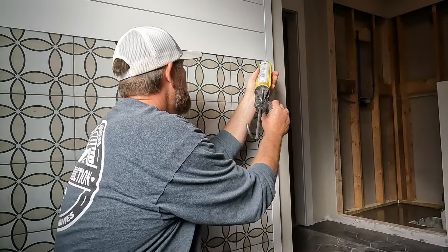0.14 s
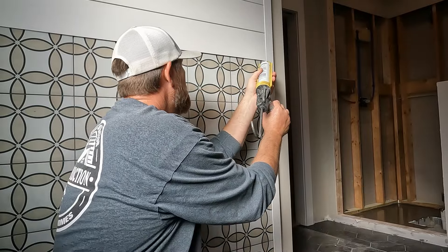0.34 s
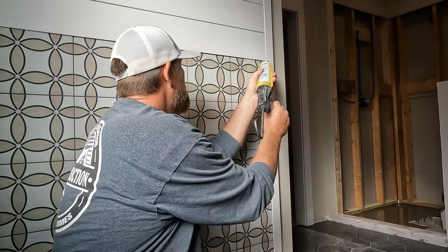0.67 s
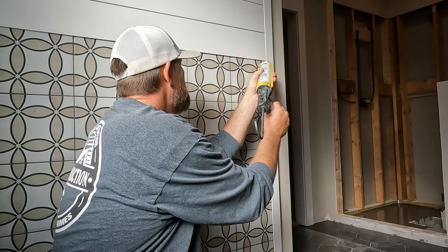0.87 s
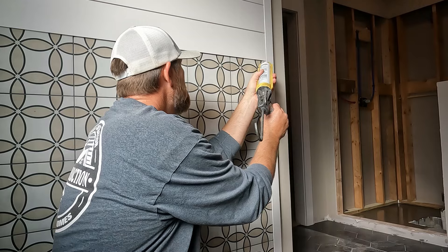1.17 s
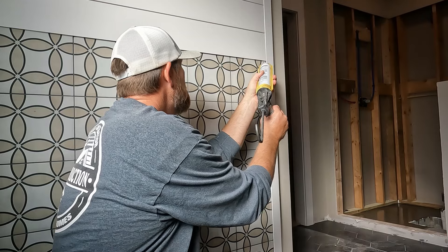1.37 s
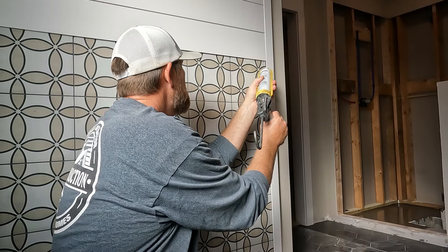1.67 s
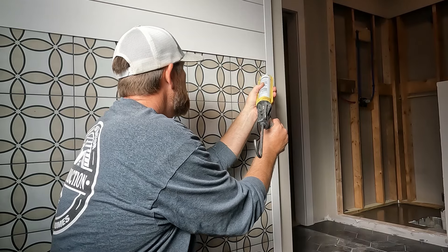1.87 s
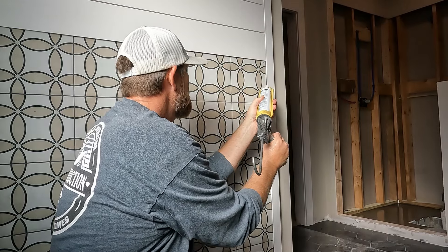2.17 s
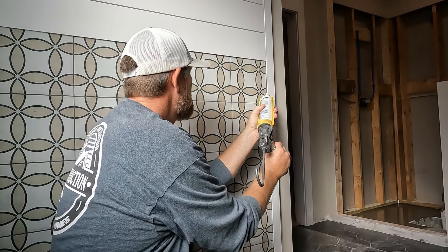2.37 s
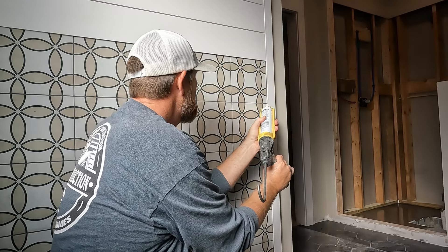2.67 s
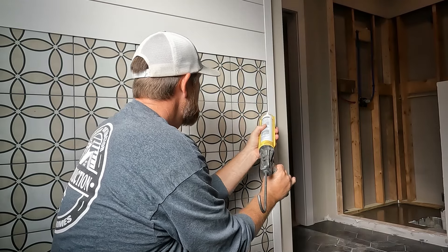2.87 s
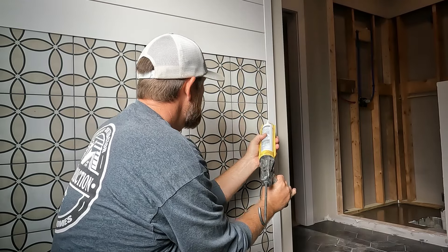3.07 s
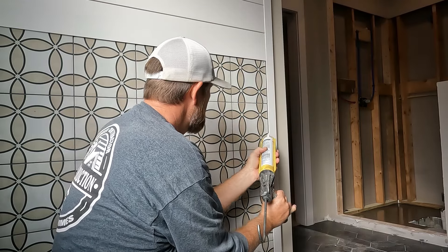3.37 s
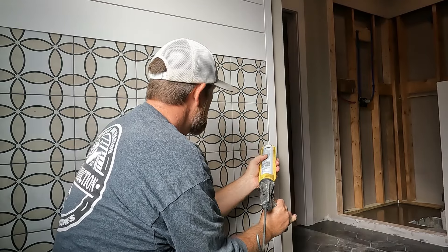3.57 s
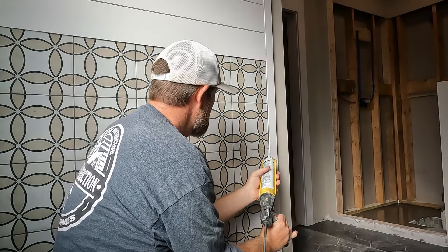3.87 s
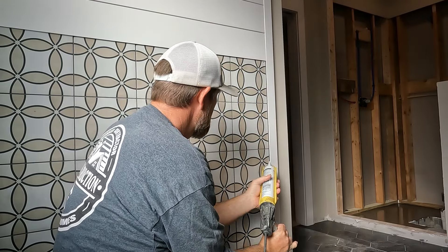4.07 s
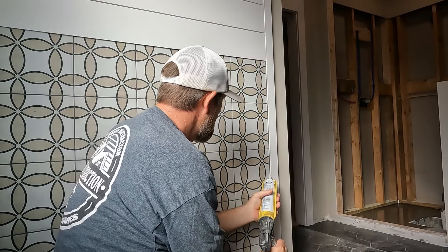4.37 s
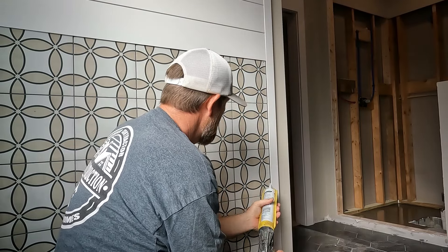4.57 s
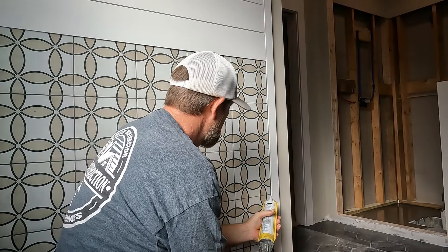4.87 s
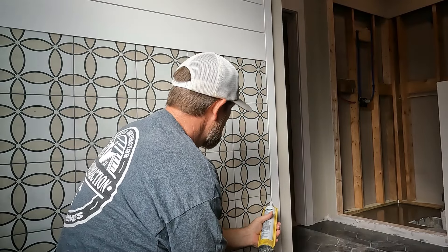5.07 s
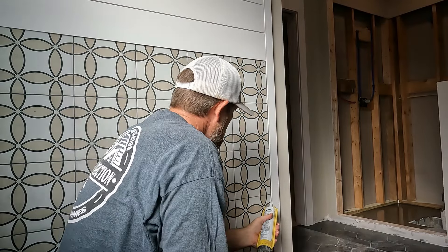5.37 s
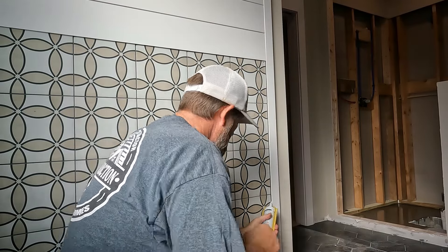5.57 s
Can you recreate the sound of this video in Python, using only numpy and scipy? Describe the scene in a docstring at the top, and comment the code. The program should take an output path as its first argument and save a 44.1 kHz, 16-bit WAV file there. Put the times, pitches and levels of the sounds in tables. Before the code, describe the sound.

Sparse, crisp clicks of a squeezed caulking gun over faint room hum, with soft knocks and thumps, ending in a loud ringing steel clack.

```python
"""A hand-held caulking gun is squeezed in a bare, tiled room under construction, a couple of metres away.
A trigger tick is dying away over air hiss, mains hum and a thin whistle; a soft knock, a floor thump and a low
dragging rub follow. Ticks go on, faint whine sets in, the rod snaps twice amid more knocks and thumps, then is
released with one loud clack. Blows are filtered pulses, knocks and thumps resonances struck once; rub, air and
whine are filtered noise, mains a sine, the whistle wavering sines. Blows and knocks ring in the room."""
import sys
import numpy as np
from scipy import signal
from scipy.fft import rfft, irfft, next_fast_len
from scipy.io import wavfile

SR = 44100
rng = np.random.default_rng(int(sys.argv[2]) if len(sys.argv) > 2 else 0)


def convert_level_to_amplitude(level_db):
    """Map a level in decibels to its linear amplitude factor."""
    exponent = np.asarray(level_db, float) / 20
    return 10 ** exponent


def store_pcm(level_fs):
    """Save levels as 16-bit WAV."""
    pcm = np.round(np.clip(level_fs, -1, 1) * 32767).astype(np.int16)
    wavfile.write(sys.argv[1], SR, np.atleast_2d(pcm).T)


N = 252252
LEAD = SR // 2  # samples of room history before time zero
M = next_fast_len(N + 3 * LEAD)
T_S = (np.arange(M) - LEAD) / SR
HZ = np.arange(M // 2 + 1) * SR / M + 0.0011  # offset avoids division by zero
BLOW_SIZE = SR // 2
BLOW_HZ = np.arange(BLOW_SIZE // 2 + 1) * SR / BLOW_SIZE + 0.001


def unit(x):
    """Scale to rms 1."""
    return x / np.sqrt(np.mean(x ** 2))


def along(table, hz):
    """Read a (frequency [Hz], value) table on a log-frequency axis."""
    table_hz, values = np.transpose(table)
    return np.interp(np.log(hz), np.log(table_hz), values)


def noise(gain):
    """Noise of rms 1 with the given spectral gain."""
    return unit(irfft(rfft(rng.standard_normal(M)) * gain, M))


def peak(hz, width_hz, f=HZ):
    """Response of one resonance, gain 1 at its centre."""
    return 1 / (1 + 1j * (f / hz - hz / f) * hz / width_hz)


def add(out, start_s, x):
    """Mix x into out at start_s."""
    i = int(round(start_s * SR)) + LEAD
    out[i:i + len(x)] += x[:M - i]


def causal(db):
    """Minimum-phase response with the given dB gain, by folding the cepstrum."""
    cepstrum = irfft(db * np.log(10) / 20)
    cepstrum[1:len(db) - 1] *= 2
    cepstrum[len(db):] = 0
    return np.exp(rfft(cepstrum))


def rings(modes):
    """dB gain of resonances standing over a flat response."""
    power = sum(np.abs(convert_level_to_amplitude(db) * peak(hz, width_hz, BLOW_HZ)) ** 2 for hz, width_hz, db in modes)
    return 10 * np.log10(1 + power)


def rattle():
    """Loose joints: all-pass resonances delay each pitch by a chance amount without colouring it."""
    rattle_s = 0.0012
    centres_hz = 1000 * 16 ** rng.random(16)
    return np.prod([2 * peak(hz, 1 / rattle_s, BLOW_HZ) - 1 for hz in centres_hz], axis=0)


# points of a tick's or snap's spectrum: frequency [Hz]
BAND_HZ = [1550, 2600, 4300, 7200, 12500]


def blow_colour(db, bass_db):
    """dB gain of a blow; an octave's peak level is spread over its width."""
    points = [(200, db[0] + bass_db - 26), (900, db[0] + bass_db)]
    points += list(zip(BAND_HZ, db))
    points += [(14000, db[-1]), (16000, db[-1] - 15)]
    return along(points, BLOW_HZ) + 20 * np.log10(SR / np.maximum(BLOW_HZ, 500))


# trigger ticks: (time [s], level at the brightest [dB], brightest frequency [Hz],
# loss away from it [dB/octave^2], level of the tube's ring [dB])
TICKS = [(-0.13, -38.5, 9100, 0.3, -50), (1.0128, -39.5, 9000, 3, -49), (1.3078, -43.5, 10500, 4.5, -65.5),
         (1.5199, -33.5, 14100, 3, -47.5), (1.7826, -34.5, 10000, 5, -47), (2.163, -44.5, 5600, 2.5, -52),
         (2.648, -59, 2600, 9, -47.5), (3.0426, -42.5, 4400, 5, -53), (3.249, -62, 9000, 4, -69),
         (3.6194, -53, 4400, 5, -61), (3.792, -49, 4000, 1, -66), (4.5827, -42.5, 6000, 2, -51),
         (4.8706, -51, 5500, 5, -65), (5.192, -40.5, 2200, 14, -43)]
# resonances of tube and frame: (frequency [Hz], width [Hz], height [dB])
BODY = [(1540, 150, 15), (4400, 600, 3), (6700, 700, 3)]


def trigger_ticks():
    """Each tick is one pulse through the tube and frame, smeared to a short rattle."""
    out = np.zeros(M)
    for start_s, top_db, bright_hz, fall_db, tube_db in TICKS:
        octaves = np.log2(np.array(BAND_HZ[1:]) / bright_hz)
        db = [tube_db, *(top_db - fall_db * octaves ** 2)]
        response = causal(blow_colour(db, bass_db=-14.5) + rings(BODY))
        add(out, start_s, irfft(response * rattle(), BLOW_SIZE))
    return out


# still air and building noise: (frequency [Hz], relative density [dB per Hz])
AIR = [(12, -51), (20, -0.5), (123, -1.5), (154, -13), (193, -4.5), (328, -6.5), (434, -8), (558, -12),
       (607, -8.5), (738, -12.5), (1190, -15), (1330, -17), (2080, -14.5), (5850, -23.5), (16000, -36.5)]
# treble hiss: (time [s], level [dB])
TREBLE = [(0, -89), (.9, -99), (1.5, -71.5), (2.5, -65.5), (3.5, -71), (4.7, -69), (5.72, -81)]


def air():
    """Steady shaped noise plus a treble hiss that swells and sinks."""
    out = convert_level_to_amplitude(-62.5) * noise(convert_level_to_amplitude(along(AIR, HZ)))
    treble_db = np.interp(T_S, *np.transpose(TREBLE))
    return out + convert_level_to_amplitude(treble_db) * noise(peak(5570, 5900) ** 2)


# hiss that differs between the channels: (frequency [Hz], relative density [dB])
SIDE_HISS = [(18, -11), (30, 0), (134, -10), (616, -10), (1220, -19), (2830, -18.5), (5310, -15.5),
             (6210, -15.5), (16000, -14.5)]


def side_hiss():
    """Steady noise, opposite in the two channels."""
    return convert_level_to_amplitude(-82) * noise(convert_level_to_amplitude(along(SIDE_HISS, HZ)))


# wavering tones: (frequency [Hz], width [Hz], level [dB])
HUM = [(121, 29, -74), (262.7, 32, -72), (451.5, 6.6, -75), (1340, 44, -72), (1742, 20, -76.5)]


def hum():
    """A steady mains sine and tones of narrow-band noise."""
    mains_hz, mains_peak_db = 120, -66.5
    out = convert_level_to_amplitude(mains_peak_db) * np.sin(2 * np.pi * mains_hz * T_S)
    for hz, width_hz, db in HUM:
        out += convert_level_to_amplitude(db) * noise(peak(hz, width_hz))
    return out


# multiples of the buzz rate: (order)
WHISTLE_ORDERS = [24, 47, 48, 49, 52]
# steady part of each multiple: (level [dB])
WHISTLE_DB = [-81, -84, -75.5, -83.5, -89]


def whistle():
    """Multiples of one slowly rising rate, each wavering in level and phase, until they fade."""
    rate_hz, rise_hz_per_s = 87.8, 0.3
    fade_middle_s, fade_s = 1.3, 0.36
    turn = 2 * np.pi * (rate_hz * T_S + rise_hz_per_s * T_S ** 2 / 2)

    def waver():
        """Slow noise of rms 0.54."""
        waver_hz = 9.5
        return 0.54 * noise(1 / (1 + 1j * HZ / waver_hz) ** 2)

    lines = np.zeros(M)
    for order, db in zip(WHISTLE_ORDERS, WHISTLE_DB):
        in_phase = (1 + waver()) * np.sin(order * turn)
        lines += convert_level_to_amplitude(db) * (in_phase + waver() * np.cos(order * turn))
    return np.sqrt(2) * lines * np.clip((fade_middle_s - T_S) / fade_s + 0.5, 0, 1)


def thud(hz, width_hz):
    """One ring of peak 1, the resonance passed twice for steep skirts."""
    ring = irfft(peak(hz, width_hz, BLOW_HZ) ** 2, BLOW_SIZE)
    return ring / np.abs(ring).max()


# dull knocks: (time [s], level [dB], damping [factor on the widths])
KNOCKS = [(.0, -47.5, 5), (2.69, -48, 1.5), (3.793, -39, 1.5), (3.832, -47, 0.5)]
# what they ring with: (frequency [Hz], width before damping [Hz], relative level [dB])
HOLLOW = [(724, 330, -0.24), (954, 224, .1)]


def knocks():
    """Soft contacts: one push through the resonances of something hollow."""
    out = np.zeros(M)
    for start_s, db, damping in KNOCKS:
        ring = sum(convert_level_to_amplitude(mode_db) * thud(hz, width_hz * damping) for hz, width_hz, mode_db in HOLLOW)
        add(out, start_s, convert_level_to_amplitude(db) * ring)
    return out


# weight shifts: (time [s], board level [dB], deep thud [Hz], top ring [Hz], top ring re boards [dB])
THUMPS = [(.019, -51, 27, 269, 2.5), (2.698, -54, 27, 250, -2.5), (3.8, -52.5, 33, 202, 6.5),
          (4.879, -53, 39.7, 328, 5.5), (5.259, -55, 48.3, 250, -5)]
# ring of the boards: (frequency [Hz], width per pass [Hz])
FLOOR = (124, 57)


def floor_thumps():
    """Weight shifts ring the boards and a higher mode, then a deep thud."""
    top_q, deep_q = 1.8, 2.4
    deep_late_s, deep_db = 0.012, -4
    out = np.zeros(M)
    for start_s, db, deep_hz, top_hz, top_db in THUMPS:
        boards = thud(*FLOOR) + convert_level_to_amplitude(top_db) * thud(top_hz, top_hz / top_q)
        add(out, start_s, convert_level_to_amplitude(db) * boards)
        add(out, start_s + deep_late_s, convert_level_to_amplitude(db + deep_db) * thud(deep_hz, deep_hz / deep_q))
    return out


# low drag: (frequency [Hz], width per pass [Hz], start [s], let go [s], level [dB], t60 [s])
RUB = [(193, 27, .33, .455, -53.5, .15), (273, 67, 0.37, 0.51, -53.5, 3.2),
       (500, 310, 0.35, 0.43, -60, 1.5), (1230, 120, 0.362, 0.45, -60.5, .15)]


def rub():
    """Noise in low resonances; each swells, holds and dies in its own time, until the drag stops."""
    attack_s, stop_s, stop_fade_s = 0.046, 0.915, 0.073
    out = np.zeros(M)
    for hz, width_hz, start_s, let_go_s, db, t60_s in RUB:
        swell = np.clip((T_S - start_s) / attack_s, 0, 1)
        swell = swell * 1000.0 ** (-np.maximum(T_S - let_go_s, 0) / t60_s)
        out += convert_level_to_amplitude(db) * swell * noise(peak(hz, width_hz) ** 2)
    return out * np.clip((stop_s - T_S) / stop_fade_s, 0, 1)


# machine whine: (middle of fade-in [s], frequency [Hz], width [Hz], level [dB])
WHINE = [(1, 3700, 220, -73), (1, 5780, 260, -77.5), (3, 7730, 610, -78)]


def whine():
    """Faint bands of noise: two set in together, a higher one later, and all stay."""
    fade_s = 0.089
    out = np.zeros(M)
    for start_s, hz, width_hz, db in WHINE:
        out += convert_level_to_amplitude(db) * np.clip((T_S - start_s) / fade_s + 0.5, 0, 1) * noise(peak(hz, width_hz))
    return out


# rod snaps: (time [s], level [dB], ring [Hz], extra above the ring [dB/octave])
SNAPS = [(2.1882, -34.5, 4050, -1), (2.5572, -31.5, 3250, 2)]
# colour of a snap at BAND_HZ: (gain [dB])
SNAP_DB = [-4.5, .2, 1.4, 1.5, -18]


def rod_snaps():
    """A single sharp slip each: one unsmeared pulse with a ring, a hollow above it and a top resonance."""
    dip_db, dip_above_oct, dip_width_oct = -5, 0.36, 0.3
    out = np.zeros(M)
    for start_s, snap_db, ring_hz, bright_db in SNAPS:
        octaves_above = np.maximum(np.log2(np.array(BAND_HZ) / ring_hz), 0)
        db = snap_db + np.array(SNAP_DB) + bright_db * octaves_above
        dip_place = (np.log2(BLOW_HZ / ring_hz) - dip_above_oct) / dip_width_oct
        dip = dip_db * np.exp(-dip_place ** 2)
        modes = [(ring_hz, 900, 8), (13600, 1500, 20)]  # (frequency [Hz], width [Hz], height [dB])
        gain_db = blow_colour(db, bass_db=-10.5) + dip + rings(modes)
        add(out, start_s, irfft(causal(gain_db), BLOW_SIZE))
    return out


# first touch, main blow, rebound: (time [s], level [dB])
RELEASE = [(5.2172, -5), (5.2205, 13), (5.232, 0.5)]
# spectrum under the rings: (frequency [Hz], relative density [dB per Hz])
RELEASE_COLOUR = [(60, -21), (110, -4), (250, -8), (420, -10), (800, -7), (1320, -6.5), (1480, -1.5),
                  (3000, -0.5), (4500, -3), (6500, -5.5), (9000, -8.5), (11000, -14), (15200, -22),
                  (16000, -61)]
# steel rod and plates: (frequency [Hz], width [Hz], height [dB])
STEEL = [(520, 86, 6.5), (624.5, 17, 12), (1540, 4.3, 16.5), (1615, 120, 9.5), (1610, 8.8, 13),
         (1845, 110, 7), (2470, 220, 6.5), (2690, 160, 1.5), (4050, 280, 7), (5100, 120, 4), (6200, 100, 1),
         (7690, 60, 9.5), (9380, 64, 12.5), (12540, 250, 10), (14290, 120, 8), (14940, 150, 13.5)]


def rod_release():
    """Three blows in quick succession ring the steel and rattle the joints."""
    out = np.zeros(M)
    for start_s, db in RELEASE:
        response = causal(along(RELEASE_COLOUR, BLOW_HZ) + rings(STEEL))
        add(out, start_s, convert_level_to_amplitude(db) * irfft(response * rattle(), BLOW_SIZE))
    return out


# first wall echoes: (delay [s], level re direct [dB])
ECHOES = [(.0028, -9), (.0037, -11), (.0072, -14)]


def early():
    """Response of the direct sound and the first wall echoes."""
    return 1 + sum(convert_level_to_amplitude(db) * np.exp(-2j * np.pi * HZ * delay_s) for delay_s, db in ECHOES)


# decay of the room: (frequency [Hz], t60 [s])
ROOM_T60 = [(60, 1.1), (250, 0.3), (700, 1.03), (1500, 0.82), (3000, 0.8), (5500, 0.75), (8000, 0.62),
            (12000, 0.39), (16000, 0.5)]


def tail():
    """Response of dense reverberation: noise in which each band dies at its own rate."""
    tail_db, rise_s = -29.5, 0.0017
    size = 2 * LEAD
    t = np.arange(size) / SR
    f = np.arange(LEAD + 1) * SR / size + 1e-3
    response = np.zeros(size)
    grain = rfft(rng.standard_normal(size))
    for octave in np.arange(4, 14.5, 0.5):
        band = np.clip(1 - 2 * np.abs(np.log2(f) - octave), 0, 1)
        response += irfft(grain * band) * 1000 ** (-t / along(ROOM_T60, 2 ** octave))
    return rfft(response * convert_level_to_amplitude(tail_db) * (1 - np.exp(-t / rise_s)), M)


# hands and back screen the direct path: (frequency [Hz], gain [dB])
SHADOW = [(1100, -3), (1500, -6), (4000, 1), (8000, 0.5), (12000, -2.5)]
# room tail that differs between the channels: (frequency [Hz], gain [dB])
SIDE_ROOM = [(150, -26), (1000, -32.5), (2500, -43), (5000, -26.5), (12000, -21)]


def scene():
    """Nearly mono: the two channels differ by a faint hiss and a part of the room tail."""
    screened = rfft(trigger_ticks() + knocks() + floor_thumps())
    unscreened = rfft(rod_snaps() + rod_release())
    blows = unscreened + screened
    direct = unscreened + convert_level_to_amplitude(along(SHADOW, HZ)) * screened
    mid = irfft(direct * early() + blows * tail(), M)
    mid += air() + hum() + whistle() + rub() + whine()
    side = side_hiss() + irfft(blows * tail() * convert_level_to_amplitude(along(SIDE_ROOM, HZ)), M)
    return np.array([mid + side, mid - side])[:, LEAD:LEAD + N]


def roll_off(x):
    """The treble ends steeply here."""
    return signal.sosfilt(signal.butter(12, 16680, fs=SR, output="sos"), x)


def record(dry):
    """The scene is the finished mix: only the treble is cut off steeply, with no gain added."""
    return roll_off(dry)


dry = scene()
out = record(dry)
store_pcm(out)
```